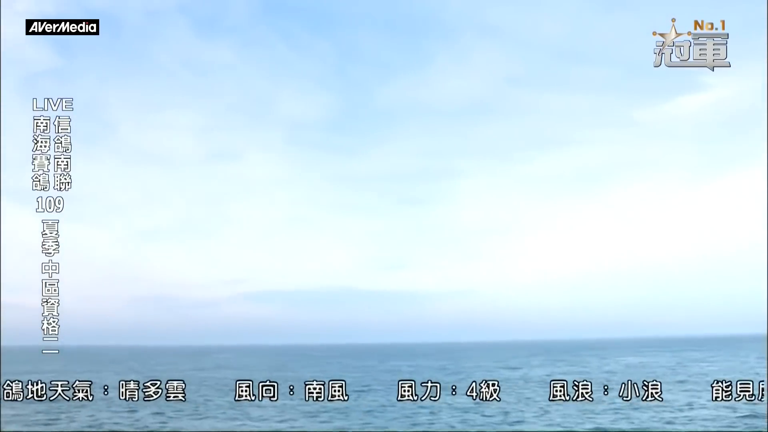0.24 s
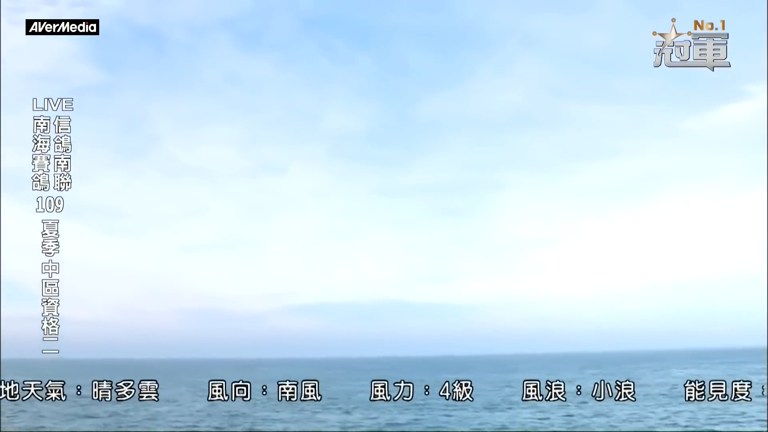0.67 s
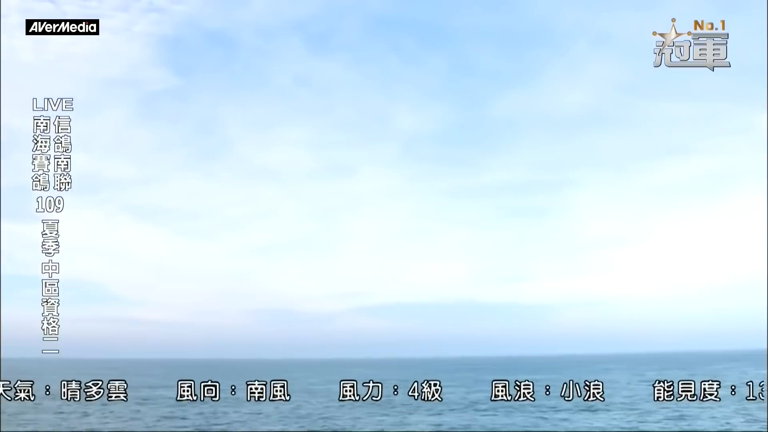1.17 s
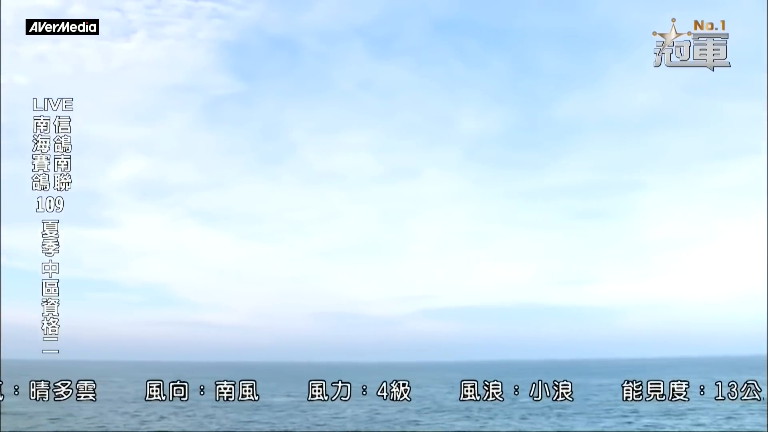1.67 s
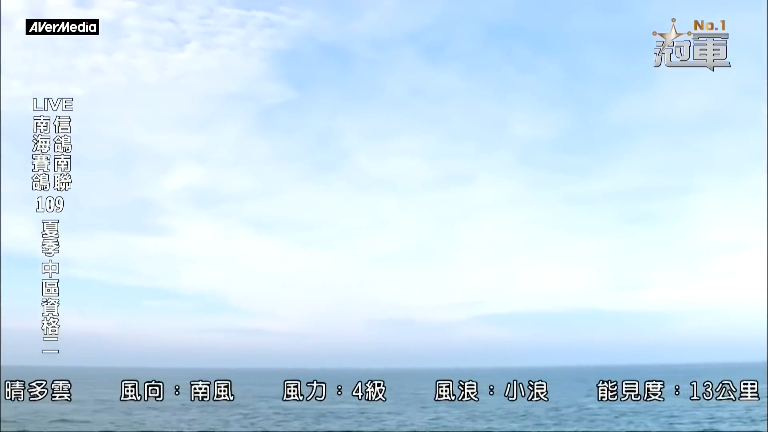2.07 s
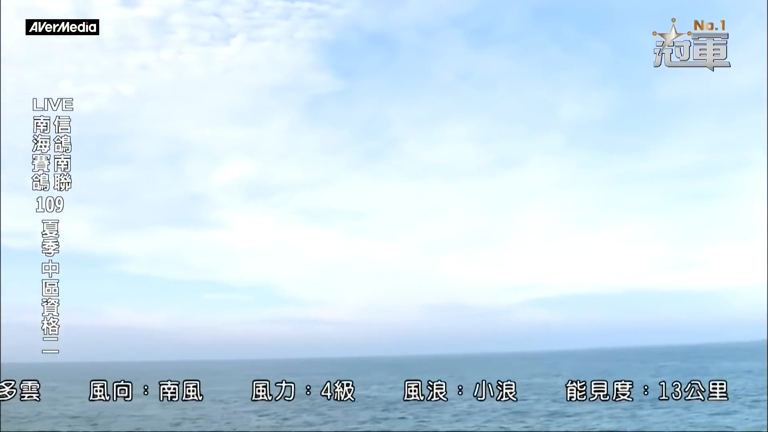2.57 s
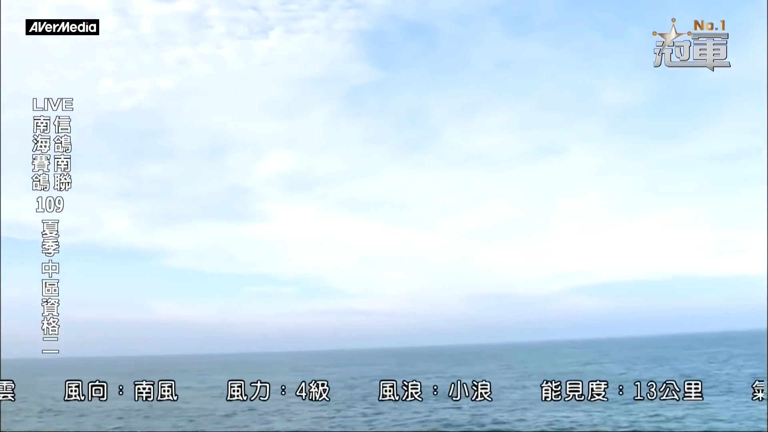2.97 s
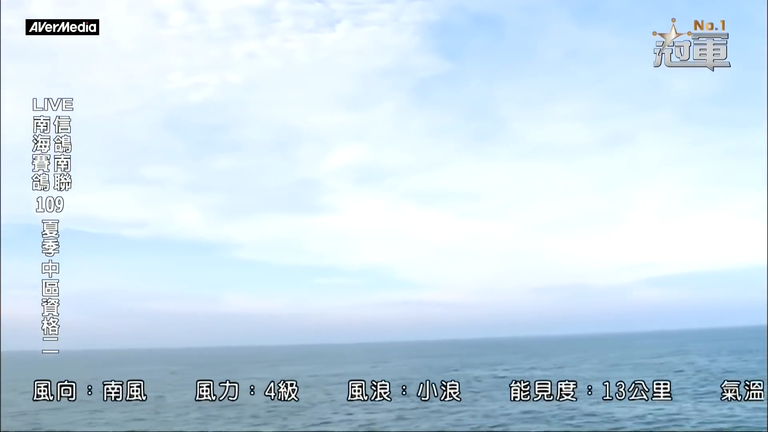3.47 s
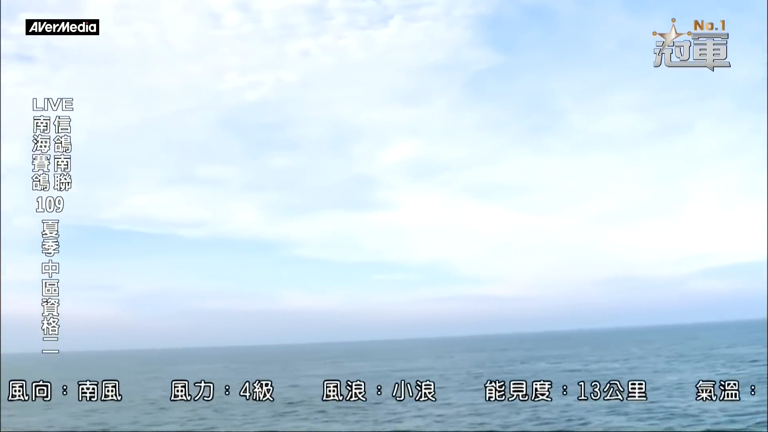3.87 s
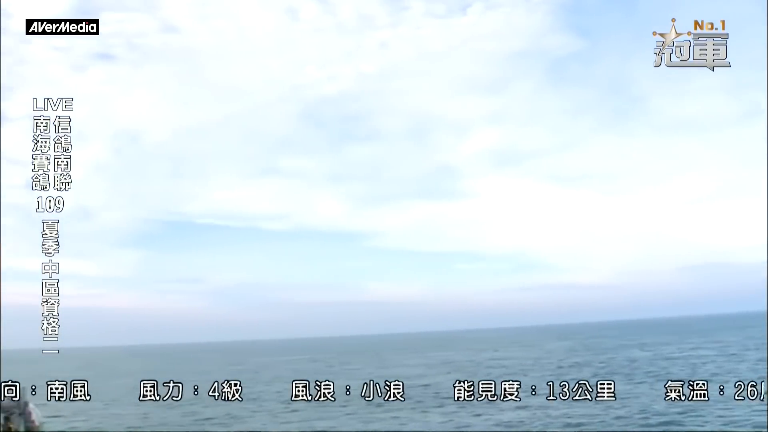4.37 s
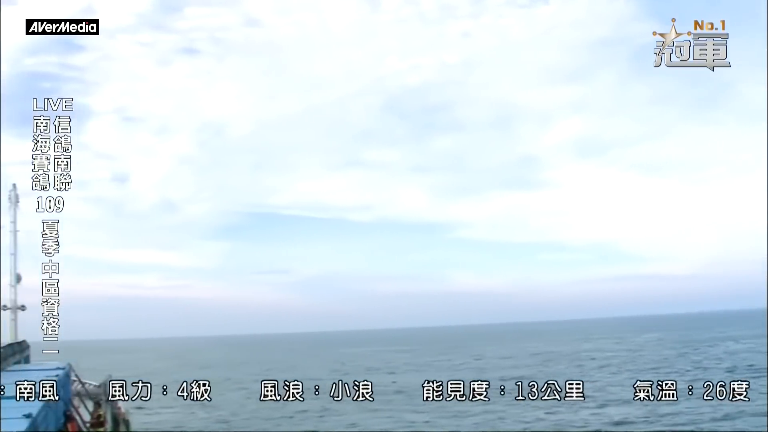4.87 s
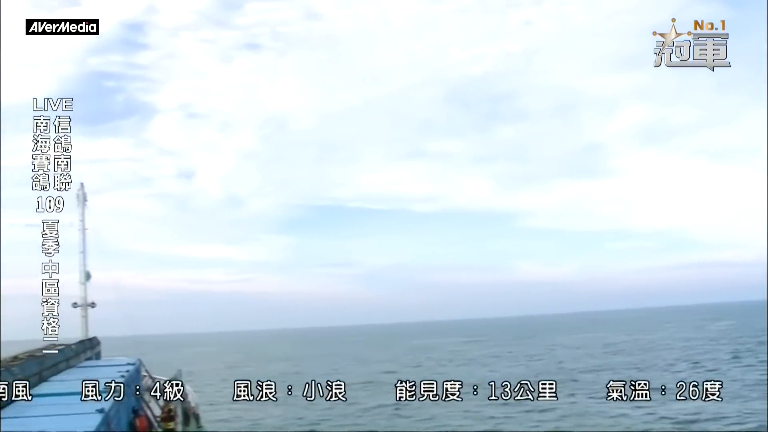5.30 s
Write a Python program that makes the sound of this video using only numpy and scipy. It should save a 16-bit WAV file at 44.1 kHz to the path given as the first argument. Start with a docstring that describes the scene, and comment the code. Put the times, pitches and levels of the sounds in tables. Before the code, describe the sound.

Outdoors on a ship at sea, a slow diesel is already running and continues to the end at an almost constant pace, about thirteen exhaust chuffs a second. Six unequal cylinders give a lumpy, repeating pattern of low booms, throaty barks and mid-pitched metal clatter, slightly dulled, with puffs of gas hiss. A low throbbing hum sits underneath, and patchy sea wash hisses softly. Engine and wash dip a little near 1.5 seconds, recover by 2.3, and ease off at the end. Wind rumbles on the microphone, with heavy low thumps around 1.3-1.4, 3.45 and 4.2 seconds and smaller ones between and after. Short casing rings stand out, strongest near 2.2 seconds, others near 3.0 and 3.45. A tiny tick comes at 1.3, then a cluster of faint high spits at 3.3-3.6. The image is nearly mono, with no sharp highs.

```python
"""A slow diesel chuffs through its exhaust pipe on the deck of a ship at sea: six cylinders of unequal
strength excite pipe and casing resonances, with gas hiss from shaped noise. Crank-locked sines make the
hum of its shafts. The wash is patchy noise; wind buffets the microphone as low noise, a single capsule
written to two channels. Low thumps, of wind or engine, are short swings; casing rings and faint high
ticks stand out."""
import sys
import numpy as np
from scipy import signal
from scipy.fft import rfft, irfft, next_fast_len
from scipy.io import wavfile
from scipy.ndimage import uniform_filter1d, map_coordinates

SR = 44100
rng = np.random.default_rng(int(sys.argv[2]) if len(sys.argv) > 2 else 0)


def wav_record(signal):
    """Record a signal, one row per channel, as 16-bit PCM in the file named by sys.argv[1]."""
    frames = np.transpose(np.atleast_2d(signal))
    bounded = np.clip(frames, -1, 1)
    # unit amplitude maps onto the largest positive 16-bit level
    quanta = np.round(bounded * 32767).astype(np.int16)
    wavfile.write(sys.argv[1], SR, quanta)


N = 244314

# Firing rate: (time [s], rate [firings/s])
FIRING_RATE = [(0, 13.38), (.5, 13.38), (1.4, 13.34), (2.4, 13.25), (3.2, 13.35), (3.65, 13.41),
               (4.5, 13.48), (5.54, 13.45)]
FIRST_CHUFF_S = .066
# Cylinders in firing order: (bark [dB], clatter [dB], gas hiss [dB])
CYLINDERS = [(2, 1, 1), (0, 0.5, -2.5), (-0.5, -2.5, 0), (-3, 3.5, -3), (0.5, 4.5, 1.5), (-2, 2.5, -3)]
# Drive of the six lowest pipe resonances, a row per cylinder: (six gains [dB])
BOOM_COLOUR = [(-4.5, -1, -3, 5.5, -14, 0), (5, 2.5, 3, -7.5, 2.5, 2), (-2.5, 0.5, -1, -4.2, -3, -2),
               (0, 0, -4, -7.5, -7, -5.5), (0.5, -1, 3, 0.5, 2.5, 4), (-2.5, -3, -11.5, -0.5, 1.5, 4)]
# Chuffs that stand out: (time [s], bark over the mean chuff [dB], boom over its cylinder [dB],
# extra on the top pipe resonances [dB])
LOUD_CHUFFS = [(.074, 7, 0, -9.5), (.149, -1.5, -2, -0.5), (.223, 5.5, -4.5, -5.5), (.298, 2.5, 1.5, -4),
               (.370, 7.5, 1, 3), (.448, 0.5, 0.5, -2.5), (.523, 3, 3, 5.5), (.672, 3.5, 3, 2),
               (.897, 7, 2.5, -5.5), (.979, 5, 1, -0.5), (1.118, 6.5, -3.5, -9), (1.197, 0.5, -2.5, 1),
               (1.265, 7, 4.5, -2), (1.571, 2, 1, -8), (1.721, 6.5, -3, -0.5), (1.796, 0.5, -2, -4),
               (1.871, -1, 1.5, 1), (2.019, 1.5, -4, -1.5), (2.17, 4, -0.5, 1.5), (2.247, 2, -2.5, -3),
               (2.328, 8, 0, 2), (2.474, 1.5, -1, 1), (2.776, 8, 5, 2), (3.147, 1, 4.5, 2.5),
               (3.221, 1.5, 2.5, 3.5), (3.45, 4.5, 10.5, 0.5), (3.522, 6.5, 1, 4.5), (3.674, -3.5, 2, -3.5),
               (3.969, 6.5, -1, -0.5), (4.123, 3.5, 6, 2.5), (4.41, 6.5, 4, -2), (4.559, 2, 7.5, 3.5),
               (4.71, 4.5, 4.5, 4.5), (4.797, 3.5, -13, -4.5), (4.86, 10, 0.5, -4), (4.937, 1, -1.5, -2),
               (5.002, 3, -1, 2), (5.311, -0.5, 2.5, 3.5), (5.383, 0.5, 4, 1.5), (5.457, 0, 3.5, 0.5)]
# Exhaust pipe resonances: (centre [Hz], width [Hz], relative level [dB])
PIPE = [(56.7, 34, -2.5), (116.6, 23, -4), (148.3, 16.8, 1.5), (180.2, 15.7, 2.5), (214.3, 25.5, -2.5),
        (227, 36, -5.5), (269, 20, -11.5), (293.4, 33, -11), (345.4, 50, -20), (353.2, 22, -11),
        (373, 34, -6), (409.3, 39, -5), (461, 97, -18), (534.8, 50, -10)]
BOOM_BELOW_HZ, PIPE_TOP_HZ = 250, 440
# Engine casing resonances: (centre [Hz], width [Hz], relative level [dB])
CASING = [(618.4, 54, -6), (737, 40, -3.5), (872.4, 77, -4.5), (927, 37, 1), (1015.5, 45, -0.5),
          (1136, 19, 2), (1211.5, 45, 0.5), (1383, 58, -4), (1524, 53, -5.5), (1650, 130, -10.5),
          (1789, 42, -3.5), (2080, 39, -19.5), (2340, 660, -29.5)]
# Casing rattle, used about its mean: (time [s], lower, middle, upper resonances [dB])
RATTLE = [(0.0, -48.5, -40.5, -41), (0.17, -43.5, -45.5, -41.5), (0.91, -43.5, -43.5, -41),
          (1.17, -44.5, -48, -43.5), (1.6, -45, -44, -47), (2.11, -40.5, -45.5, -48.5),
          (2.2, -40, -40, -41.5), (2.25, -40.5, -45, -39), (3.24, -42.5, -45.5, -54),
          (3.61, -48.5, -39, -53), (3.95, -44.5, -50, -45), (4.75, -44.5, -46, -46.5),
          (4.89, -40, -45, -43), (4.97, -45.5, -42, -46), (5.48, -46.5, -51, -50.5),
          (5.54, -58.5, -52.5, -54.5)]
# Edges between those three groups: (frequency [Hz])
RATTLE_SPLIT_HZ = [1090, 1300]
# Exhaust gas noise: (frequency [Hz], relative density [dB])
GAS = [(120, -29), (300, -11.5), (600, -11), (1000, -3.5), (1700, -9.5), (2500, -14), (3200, -22),
       (4200, -29), (6500, -42.5), (10000, -74.5)]
# Second, brighter spurt of gas between firings: (frequency [Hz], relative density [dB])
VALVES = [(1200, -25), (2500, 1), (4000, -12), (6500, -27), (10000, -44)]
VALVES_DB, VALVES_AFTER_S = -62, 0.048
# How well engine and wash carry to the deck, used about its mean: (time [s], level [dB])
CARRY = [(0.0, -44), (0.49, -44), (0.82, -44.5), (0.85, -43.5), (0.88, -44.5), (1.51, -50.5), (2.33, -43),
         (3.07, -44), (3.1, -41), (3.44, -46.5), (3.56, -46), (3.87, -46.5), (3.93, -45), (4.17, -47.5),
         (4.97, -45.5), (5.54, -51)]
# Layer levels at mean carry; boom, bark and clatter before the deckhouse low-pass
BOOM_DB, BARK_DB, CLATTER_DB, GAS_DB, WASH_DB = -36, -43, -41, -45.5, -42.5
BOOM_DB_PER_CARRY_DB, BARK_DB_PER_CARRY_DB, CLATTER_DB_PER_RATTLE_DB = 0.75, 0.71, 1.3
# Engine tones: (multiple of the six-firing cycle, rounded in use [1], relative level [dB],
# swells per cycle [1], swell [dB], swell peak [firings], throb per firing [dB], throb peak [firings])
HUM_TONES = [(24, -5.5, 2, 2.5, -2.5, 3.5, 0.57), (33, -3.5, 1, 3.5, 2, 4, 0.13),
             (41, 0.5, 1, 1, 2.5, 3, 0.12), (67.4, -20, 1, 4, 7.5, 9, 0.11),
             (94.9, -15.5, 1, -1.5, 2.5, 2.5, 0.12), (85.04, -19, 1, 0.5, 0.5, 2, .1)]
# Hum: (time [s], level [dB])
HUM_LEVEL = [(0, -31), (.25, -28.5), (.48, -32), (.7, -28), (.95, -31), (1.3, -30.5), (1.5, -33.5),
             (1.8, -32), (2.05, -30), (2.3, -32), (2.5, -30), (2.95, -31), (3.2, -31.5), (3.6, -33.5),
             (3.85, -30.5), (4.08, -34), (4.6, -30.5), (5.1, -32.5), (5.54, -30)]
# Wash noise: (frequency [Hz], relative density [dB])
WASH = [(120, -35.5), (240, -1.5), (500, -9), (1000, -6.5), (1600, -10.5), (2500, -15), (3200, -23),
        (4200, -28.5), (5500, -33.5), (6500, -41.5), (8000, -51), (10000, -67), (12700, -86)]
# Wind noise: (frequency [Hz], relative density [dB])
BUFFET = [(12, -42.5), (22, -8.5), (45, 0), (80, -5), (100, -5), (125, -7.5), (170, -13.5), (240, -26.5),
          (400, -81.5)]
# Wind on the capsule: (time [s], level [dB])
WIND_LEVEL = [(0.0, -32), (0.48, -36.5), (1.09, -32), (1.22, -32), (1.4, -28), (1.73, -41), (2.28, -31.5),
              (2.41, -34), (2.67, -33.5), (2.87, -28), (3.07, -34.5), (3.93, -37.5), (4.15, -33),
              (4.29, -30.5), (4.6, -35.5), (5.03, -30), (5.3, -30), (5.54, -30.5)]
# Casing rings that stand out: (time [s], peak [dB], frequency [Hz])
RINGS = [(.028, -38, 1198), (.248, -38, 1112), (.318, -47, 1255), (.457, -35, 1139), (.538, -38, 961),
         (.68, -33.5, 994), (.815, -33.5, 953), (.907, -38, 1180), (1.765, -37, 1134), (2.185, -26.5, 929),
         (2.404, -34.5, 1198), (2.622, -40, 885), (2.792, -35, 1022), (3.006, -30.5, 1003),
         (3.073, -35.5, 906), (3.44, -32, 863), (3.452, -50.5, 3640), (3.455, -35.5, 957),
         (3.468, -36, 1200), (3.495, -54, 3680), (3.625, -40, 1210), (3.781, -37.5, 1220),
         (4.869, -32.5, 968), (5.311, -37, 983), (5.42, -35.5, 877)]
# Low thumps, of wind or engine: (time [s], peak [dB], frequency [Hz], length [cycles])
THUMPS = [(0.602, -24, 76.6, 1.1), (0.748, -18.5, 74.4, 2.1), (1.283, -16.5, 72.4, 0.82),
          (1.305, -11, 67.8, 1), (1.372, -9.5, 59.4, 1.1), (1.399, -14, 76.2, 0.84),
          (2.337, -16.5, 54.8, 0.51), (2.85, -18, 98, 0.46), (2.946, -14, 83, 0.63),
          (2.988, -21.5, 47.5, 1.2), (3.301, -16, 112, 0.41), (3.461, -10.5, 84, 1.8),
          (4.16, -18.5, 59.4, 1.4), (4.196, -12, 78.8, 1.4), (4.218, -10, 89.3, 0.69), (4.25, -18, 37, 1.7),
          (4.436, -18.5, 53, 1.2), (4.99, -20, 80.4, 1.3), (5.166, -19, 89.8, 2.4), (5.404, -16, 66, 4.4),
          (5.463, -21, 59.6, 1.3)]
# Faint high ticks and spits: (time [s], level before the band filter [dB], upper edge [Hz], fall [s])
TICKS = [(1.315, -48, 12160, 0.0004), (3.31, -57, 9500, 0.005), (3.395, -57, 9600, .015),
         (3.412, -59, 8500, .008), (3.422, -56.5, 9800, 0.011), (3.442, -56, 9400, .01),
         (3.472, -57, 9800, 0.0074), (3.482, -63, 9000, 0.0059), (3.495, -59, 9700, 0.013),
         (3.514, -56, 9000, 0.0038), (3.588, -67, 10000, .006), (3.604, -49.5, 9800, 0.0057)]
# Part that differs between the channels: (frequency [Hz], level relative to the sound [dB])
UNLIKE = [(15, -22.5), (40, -31.5), (90, -52), (180, -66), (300, -57.5), (500, -49), (800, -28.5),
          (2000, -23), (5000, -17), (7000, -8.5), (12000, -6)]
# Lag of the right channel: (frequency [Hz], lag [samples])
RIGHT_LAG = [(25, 2.3), (60, 1.5), (130, .1), (300, .06), (500, .28), (800, .63), (1300, .77), (7000, .8)]
# Steady converter offset, left and right: (offset [full scale])
OFFSET = [
    [.0116],
    [.0171],
]
TOP_HZ = 12750


def amp(db):
    """dB to gain."""
    return 10 ** (np.asarray(db) / 20)


def unit(x):
    """Scaled to rms 1."""
    return x / np.sqrt(np.mean(x ** 2) + 1e-20)


def along(points, hz):
    """(Hz, value) points on a log axis."""
    f, v = np.transpose(points)
    return np.interp(np.log(hz + 1), np.log(f + 1), v)


def curves(rows):
    """One value per sample for each column after the time."""
    s, *cols = np.transpose(rows)
    return [np.interp(np.arange(N) / SR, s, c) for c in cols]


def wobble(knots_per_s):
    """A smooth random curve."""
    knots = rng.standard_normal(int(N * knots_per_s / SR) + 4)
    return map_coordinates(knots, [np.arange(N) * knots_per_s / SR])


def filtered(x, response):
    """x times a complex response of frequency."""
    m = next_fast_len(N + SR // 2)
    return irfft(rfft(x, m) * response(np.fft.rfftfreq(m, 1 / SR)), m)[..., :N]


def resonant(x, modes):
    """x through parallel resonances of alternating sign."""
    return filtered(x, lambda f: sum((-1) ** k * amp(db) * 1j * f * w / (c * c - f * f + 1j * f * w)
                                     for k, (c, w, db) in enumerate(modes)))


def rush(spectrum, patchy_db):
    """Coloured noise of rms 1 with time-frequency patches of random gain."""
    z = signal.stft(rng.standard_normal(N), nperseg=512)[2]
    field = uniform_filter1d(rng.standard_normal(z.shape), 6, 0)
    field = uniform_filter1d(field, 12, 1)
    noise = signal.istft(z * amp(patchy_db * unit(field)), nperseg=512)[1][:N]
    return unit(filtered(noise, lambda hz: amp(along(spectrum, hz))))


def puffs(starts_s, sizes, rise_s, fall_s):
    """A swell that rises and falls after each start."""
    t = np.arange(SR // 4) / SR
    train = np.bincount(np.clip(starts_s * SR, 0, N - 1).astype(int), sizes, N)
    swell = (1 - np.exp(-t / rise_s)) ** 2 * np.exp(-t / fall_s)
    return signal.fftconvolve(train, swell)[:N]


def carry():
    """How far the carry lies above its mean, dB."""
    db = curves(CARRY)[0]
    return db - db.mean()


def crank():
    """Firings counted from the first chuff."""
    return np.cumsum(curves(FIRING_RATE)[0]) / SR - FIRST_CHUFF_S * FIRING_RATE[0][1]


def chuffing(starts_s, cylinder, strength_db, modes, rise_s, fall_s, rough, spread_db, stray):
    """Each firing rings every resonance, in a phase fixed per cylinder; turbulent gas roughens the ring."""
    sizes = amp(strength_db + spread_db * rng.standard_normal((len(starts_s), len(modes))))
    habit_turns = rng.random((len(CYLINDERS), len(modes)))[cylinder]
    # warped time: each group of resonances wanders a little in pitch, at random
    t = np.cumsum(1 + stray * wobble(9)) / SR
    struck = np.interp(starts_s, np.arange(N) / SR, t)
    phases = 2 * np.pi * (habit_turns + np.outer(struck, np.array(modes)[:, 0]))
    out = np.zeros(N)
    for k, (hz, width_hz, db) in enumerate(modes):
        life_s = 0.67 / width_hz  # wide resonances die sooner
        cos = puffs(starts_s, sizes[:, k] * np.cos(phases[:, k]), rise_s, life_s)
        sin = puffs(starts_s, sizes[:, k] * np.sin(phases[:, k]), rise_s, life_s)
        ring = unit(cos * np.cos(2 * np.pi * hz * t) + sin * np.sin(2 * np.pi * hz * t))
        gas = (puffs(starts_s, sizes[:, k], rise_s, fall_s) + 0.029) * rng.standard_normal(N)
        narrow = resonant(gas, [(hz, 0.79 * width_hz, 0)])
        narrow = resonant(narrow, [(hz, 1.5 * width_hz, 0)])  # twice, for steep flanks
        out += amp(db) * np.sqrt(width_hz) * (ring + rough * unit(narrow))
    return unit(out)


def firings():
    """Start, cylinder and bark, clatter, gas, boom and top-pipe strengths (dB) of each firing."""
    starts_s = np.flatnonzero(np.diff(np.floor(crank()), prepend=-9)) / SR  # sample 0 counts too
    cylinder = (np.arange(len(starts_s)) - 1) % len(CYLINDERS)
    bark, clatter, gas = np.array(CYLINDERS)[cylinder].T
    boom = np.array(BOOM_COLOUR)[cylinder]
    top = np.zeros(len(starts_s))
    for s, bark_db, boom_db, top_db in LOUD_CHUFFS:
        k = np.argmin(abs(starts_s + .008 - s))
        bark[k], boom[k], top[k] = bark_db, boom[k] + boom_db, top_db
    starts_s = starts_s + .0004 * rng.standard_normal(len(starts_s))
    return starts_s, cylinder, bark, clatter, gas, boom, top


def exhaust(starts_s, cylinder, bark, boom, top):
    """Pressure pulses boom in the low pipe resonances and bark in the higher ones."""
    low = [mode for mode in PIPE if mode[0] < BOOM_BELOW_HZ]
    high = PIPE[len(low):]
    booms = chuffing(starts_s - .008, cylinder, boom, low, rise_s=0.0058, fall_s=0.038,
                     rough=0.34, spread_db=1.5, stray=.008)
    bark = bark[:, None] + np.outer(top, np.array(high)[:, 0] > PIPE_TOP_HZ)
    barks = chuffing(starts_s - .004, cylinder, bark, high, rise_s=0.01, fall_s=0.02,
                     rough=0.4, spread_db=1.7, stray=0.026)
    return (amp(BOOM_DB + BOOM_DB_PER_CARRY_DB * carry()) * booms
            + amp(BARK_DB + BARK_DB_PER_CARRY_DB * carry()) * barks)


def casing(starts_s, cylinder, clatter):
    """Firings rattle the casing resonances, in three groups of varying level."""
    at = (starts_s * SR).astype(int).clip(0, N - 1)
    level = np.array([(db - db.mean())[at] for db in curves(RATTLE)])
    group = np.searchsorted(RATTLE_SPLIT_HZ, np.array(CASING)[:, 0])
    rattle = CLATTER_DB_PER_RATTLE_DB * level[group].T
    return amp(CLATTER_DB) * chuffing(starts_s + 0.00511, cylinder, clatter[:, None] + rattle, CASING,
                                      rise_s=0.004, fall_s=0.036, rough=3.5, spread_db=3.0, stray=.012)


def gas_hiss(starts_s, gas):
    """Escaping gas is noise puffed by each firing, then a brighter spurt between firings."""
    hiss = puffs(starts_s + 0.008, amp(gas), rise_s=0.0074, fall_s=0.037) + 0.014
    hiss = hiss * rush(GAS, patchy_db=1.87)
    spurt = puffs(starts_s + VALVES_AFTER_S, amp(gas), rise_s=0.0025, fall_s=0.0093)
    spurt = spurt * rush(VALVES, patchy_db=0.0)
    return amp(carry()) * (amp(GAS_DB) * unit(hiss) + amp(VALVES_DB) * unit(spurt))


def diesel(dull_hz=2500):
    """Firings drive pipe and casing, dulled by three low-pass poles, and the undulled gas hiss."""
    starts_s, cylinder, bark, clatter, gas, boom, top = firings()
    engine = exhaust(starts_s, cylinder, bark, boom, top) + casing(starts_s, cylinder, clatter)
    dull = filtered(engine, lambda hz: 1 / (1 + 1j * hz / dull_hz) ** 3)  # heard through the deckhouse
    return dull + gas_hiss(starts_s, gas)


def hum():
    """Low tones tied to the crank swell with the engine's cycle and throb with each firing."""
    turn, count = 2 * np.pi * crank(), len(CYLINDERS)
    tones = np.zeros(N)
    for multiple, db, swells, swell_db, peak, throb_db, throb_peak in HUM_TONES:
        swell = swell_db * np.cos(round(swells) * (turn - 2 * np.pi * peak) / count)
        throb = throb_db * np.cos(turn - 2 * np.pi * throb_peak)
        level_db = db + 0.34 * wobble(3.06) + swell + throb
        phase = round(multiple) * turn / count + 2 * np.pi * rng.random() + 0.34 * wobble(1.4)
        tones += amp(level_db) * np.sin(phase)
    return amp(curves(HUM_LEVEL)[0]) * unit(tones)


def wash():
    """The wash hisses: patchy broadband noise that follows the carry."""
    return amp(WASH_DB + carry() + 0.13 * wobble(3.7)) * rush(WASH, patchy_db=1.42)


def wind():
    """Wind buffets the capsule: low noise in lumps."""
    lumps = amp(1.1 * wobble(7.1)) * rush(BUFFET, patchy_db=1.4)
    return amp(curves(WIND_LEVEL)[0]) * unit(lumps)


def rings(rise_s=0.0029, fall_s=0.019, quick_hz=1300):
    """One casing resonance swells above the rest for a moment."""
    t, out = np.arange(SR // 5) / SR, np.zeros(N + SR)
    for s, db, hz in RINGS:
        pace = max(1, hz / quick_hz)  # high rings are briefer
        swell = (1 - np.exp(-pace * t / rise_s)) ** 2 * np.exp(-pace * t / fall_s)
        walk = np.cumsum(rng.standard_normal(len(t)))
        drift = 0.061 * uniform_filter1d(walk, size=40)  # a rough, wandering phase
        ring = swell / swell.max() * np.sin(2 * np.pi * hz * t + drift)
        out[round(s * SR):][:len(t)] += amp(db) * ring
    return out[:N]


def thumps():
    """Low thumps, of wind or engine: each a short low swing under a bell-shaped envelope."""
    t, out = np.arange(N) / SR, np.zeros(N)
    for s, db, hz, cycles in THUMPS:
        u = (t - s) * hz
        out += amp(db) * np.exp(-(2 * u / cycles) ** 2) * np.cos(2 * np.pi * u)
    return out


def ticks():
    """Brief bright noise bursts, each with its own length and upper edge."""
    t, out = np.arange(SR // 20) / SR, np.zeros(N + SR)
    for s, db, top_hz, fall_s in TICKS:
        swell = (1 - np.exp(-4 * t / fall_s)) * np.exp(-t / fall_s)
        burst = amp(db) * swell * rng.standard_normal(len(t))
        band = signal.butter(7, [4000, top_hz], "band", fs=SR, output="sos")
        out[round(s * SR):][:len(t)] += signal.sosfilt(band, burst)
    return out[:N]


def scene():
    """One mono sound field, copied to two channels."""
    mono = diesel() + hum() + wash() + wind() + rings() + thumps() + ticks()
    return np.tile(mono, (2, 1))


def record(dry):
    """The right channel lags, is a shade louder and differs a little; nothing passes above TOP_HZ."""
    z = signal.stft(dry[0], nperseg=1024)[2]
    scrambled = z * np.exp(2j * np.pi * rng.random(z.shape))  # same spectrum, random phase
    other = signal.istft(scrambled, nperseg=1024)[1][:N]
    other = filtered(unit(other) * np.std(dry), lambda hz: amp(along(UNLIKE, hz)))

    def response(hz):
        """Lag on the right only, with a sharp upper band limit."""
        lag_s = along(RIGHT_LAG, hz) * np.array([[0], [1]]) / SR
        return np.exp(-2j * np.pi * hz * lag_s) * (hz < TOP_HZ)

    both = filtered(dry + [[1], [-1]] * other, response)
    return amp([[-.03], [.03]]) * both + OFFSET


dry = scene()
out = record(dry)
wav_record(out)
```